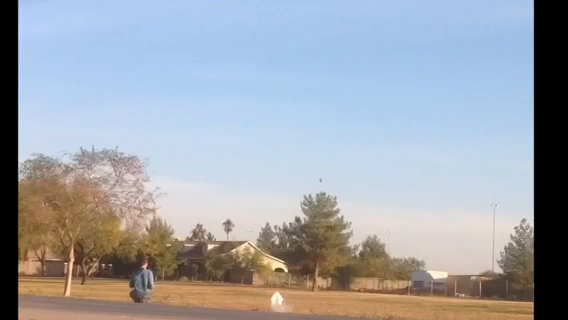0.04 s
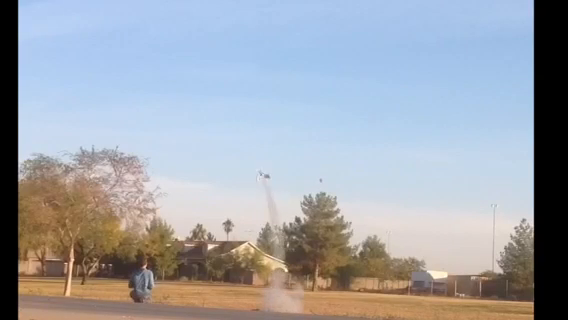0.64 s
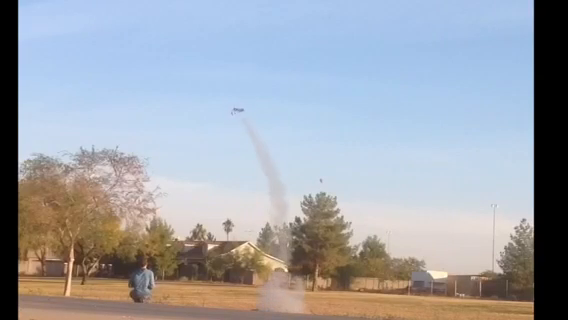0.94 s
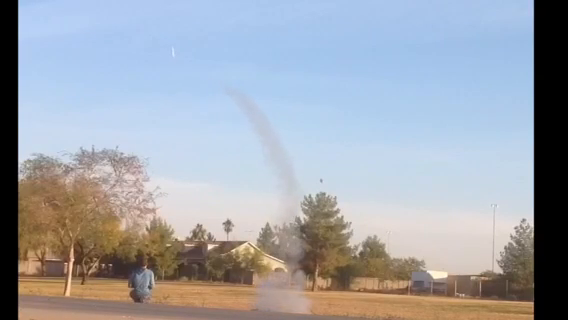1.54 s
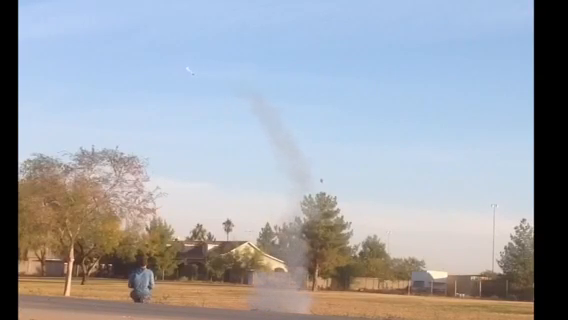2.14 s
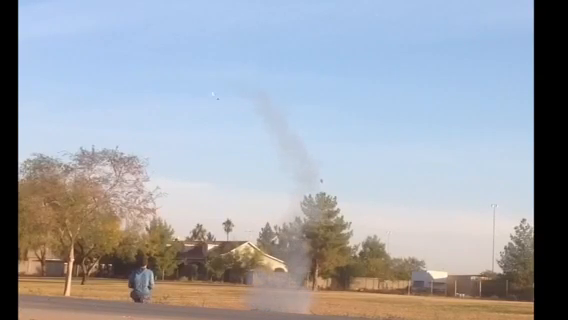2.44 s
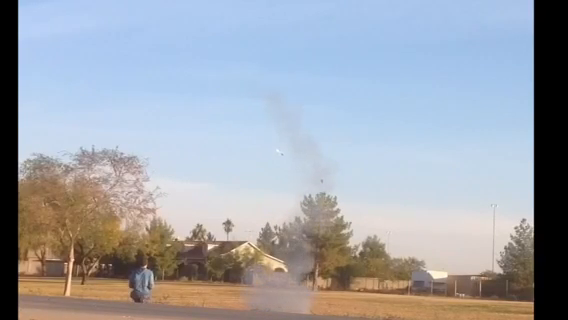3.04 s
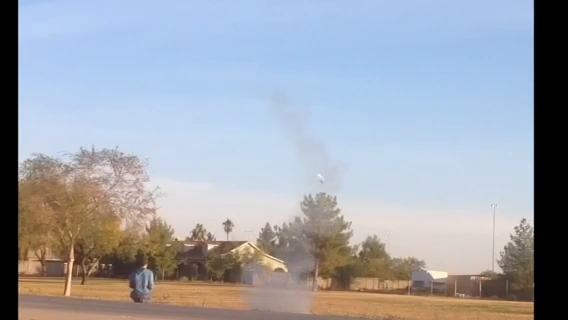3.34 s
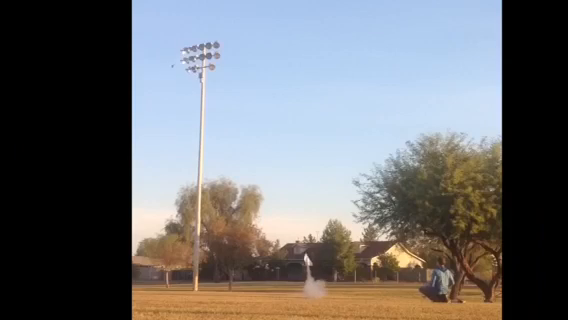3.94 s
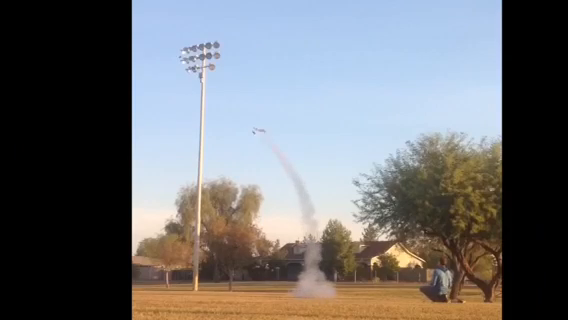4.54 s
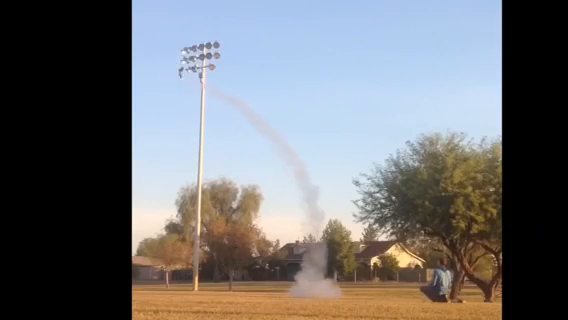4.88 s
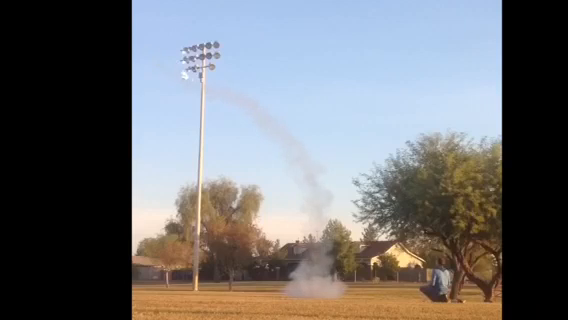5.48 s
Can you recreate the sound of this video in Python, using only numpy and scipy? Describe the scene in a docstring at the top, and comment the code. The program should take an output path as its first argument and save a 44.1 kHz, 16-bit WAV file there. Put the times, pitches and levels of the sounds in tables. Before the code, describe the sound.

A model rocket motor hisses sharply and stops, then a second does the same, outdoors with a low rumble of far traffic.

```python
"""A park, where two model rockets lift off one after the other. Each motor hisses, deepens as its nozzle
swings toward the listener, and burns out abruptly; the bounce off the ground sweeps notches down through
the hiss. Trees and houses echo faintly. Behind the first launch, distant traffic rumbles and a bird
chirps once. Behind the second, whose exhaust roars briefly on the pad, a far engine hums over traffic."""
import sys
import numpy as np
from scipy import signal
from scipy.fft import rfft, irfft, next_fast_len
from scipy.io import wavfile
from scipy.ndimage import uniform_filter1d, map_coordinates

SR = 44100
rng = np.random.default_rng(int(sys.argv[2]) if len(sys.argv) > 2 else 0)


def digitize_waveform(pressure):
    """Quantize a signal to 16-bit integers and store it at the path in sys.argv[1].

    Rows of a 2-D input are taken as channels; values are limited to [-1, 1].
    """
    field = np.atleast_2d(pressure).T
    bounded = np.clip(field, -1, 1)
    quanta = np.round(bounded * 32767).astype(np.int16)
    wavfile.write(sys.argv[1], SR, quanta)


N = 251955
TIME = np.arange(N) / SR
TOP_HZ = 15400  # upper edge of the sound
BACKGROUND_SWITCH_S = 3.56

# Loudness of each motor up to burnout: time_s, level_db
FIRST_BURN = [(0.0, -14.5), (0.16, -10.5), (0.354, -21.5), (0.442, -20), (0.54, -13.5), (0.788, -9.5),
              (0.824, -12), (0.94, -10.5), (1.26, -17)]
SECOND_BURN = [(3.57, -32), (3.63, -25.5), (3.9, -9.5), (4.118, -15), (4.24, -13), (4.332, -13.5),
               (4.514, -11), (4.894, -10.5), (4.914, -12.5), (5.02, -12)]
# Moments when each hiss brightens: centre_s, width_s, tilt_db_per_octave
FIRST_BRIGHTENING = [(.285, 0.061, 1.5), (.76, 0.37, 2.5)]
SECOND_BRIGHTENING = [(4.587, 0.2, 1.75)]
# Tone of each nozzle, before the flight colours it: frequency_hz, level_db
FIRST_NOZZLE = [(700, -24), (1500, -15.5), (2300, -8.5), (3200, -8), (4200, -4), (5500, -2.5), (7000, 2),
                (9000, -1), (11500, -2), (13500, -4), (15300, -6)]
SECOND_NOZZLE = [(700, -18), (1500, -8), (2500, -3), (3100, -3.5), (4000, 0), (5500, 1.5), (9000, 2),
                 (13000, -0.5), (15300, -3)]
# Time for the echo off trees and houses to fall 60 dB, before stretching: frequency_hz, decay_s
ECHO_DECAY = [(1000, 2.5), (4000, 1.1), (8000, .68), (14000, .38)]
# Tone of the traffic behind each launch: frequency_hz, level_db
FIRST_TRAFFIC = [(25, -49), (48, -43), (73, -26), (95, -19), (131, -8.5), (243, -1.5), (293, -5),
                 (394, -11.5), (520, -11.5), (750, -18.5), (1600, -20), (2300, -27.5), (3200, -38),
                 (5000, -46.5), (14500, -51.5), (15400, -61)]
SECOND_TRAFFIC = [(25, -36), (50, -28), (80, -23), (115, -2.5), (180, -0.5), (260, -3), (380, -7),
                  (600, -9), (1300, -10.5), (2000, -16.5), (3000, -24.5), (5000, -38.5), (14500, -45),
                  (15400, -50)]
# Droning bands in the first traffic: centre_hz, width_hz, level_db
DRONE_BANDS = [(91.3, 11, -14), (135, 19.9, -8.5), (230.7, 21, -0.5), (290, 9, 5)]
# Tone of exhaust striking the launch pad: frequency_hz, level_db
PAD_ROAR = [(30, -36), (200, -3.5), (380, -2), (780, -4), (1050, -17.5), (2500, -27.5)]


def amp(db):
    """Decibels to gain."""
    return 10 ** (np.asarray(db) / 20)


def unit(x):
    """Scale to rms 1."""
    return x / np.sqrt(np.mean(x ** 2) + 1e-20)


def along(points, hz):
    """Read a curve of frequency_hz, value points on a log frequency axis."""
    point_hz, values = np.transpose(points)
    return np.interp(np.log(hz + 1), np.log(point_hz), values)


def swell(centre_s, width_s):
    """A bell-shaped rise and fall that peaks at 1."""
    return np.exp(-((TIME - centre_s) / width_s) ** 2)


def wobble(rate_hz):
    """A smooth random drift through rate_hz points a second."""
    return map_coordinates(rng.standard_normal(int(N * rate_hz / SR) + 4), [TIME * rate_hz])


def sine(hz):
    """A sine of rms 1 that follows a pitch curve."""
    return np.sqrt(2) * np.sin(2 * np.pi * np.cumsum(hz) / SR)


def filtered(x, response):
    """Equalise x with a gain given as a function of frequency."""
    size = next_fast_len(N + SR // 2)
    return irfft(rfft(x, size) * response(np.fft.rfftfreq(size, 1 / SR)), size)[:N]


def noise(spectrum):
    """Noise of rms 1 with the given colour."""
    return unit(filtered(rng.standard_normal(N), lambda hz: amp(along(spectrum, hz))))


def flight(brightening, liftoff_s, climb_s, top_notch_hz, swing_at_s, swing_s, edges_hz, tilts_db):
    """Low cut, tilt per octave and first notch of a climb. Edges and tilts go: pad, swung round, top."""
    # the rocket speeds up, then levels off; its nozzle swings round early on
    height = 1 - np.exp(-(np.maximum(TIME - liftoff_s, 0) / climb_s) ** 2)
    swing = (1 + np.tanh((TIME - swing_at_s) / swing_s)) / 2
    pad_hz, air_hz, top_hz = edges_hz
    edge_hz = pad_hz * (air_hz / pad_hz) ** swing * (top_hz / air_hz) ** height
    pad_db, air_db, top_db = tilts_db
    tilt_db = pad_db + (air_db - pad_db) * swing + (top_db - air_db) * height
    tilt_db += sum(db * swell(centre_s, width_s) for centre_s, width_s, db in brightening)
    # the lag of the ground bounce grows with height, pulling the notch down from above hearing
    pad_notch_hz = 36000
    notch_hz = 1 / ((1 - height) / pad_notch_hz + height / top_notch_hz)
    return edge_hz, tilt_db, notch_hz


def thrust(burn, burnout_s):
    """A motor's envelope: it lights at once, burns, then dies ever faster, by 60 dB in burnout_s."""
    time_s, level_db = np.transpose(burn)
    lit = TIME > time_s[0] - .008
    spent = np.maximum(TIME - time_s[-1], 0) / burnout_s
    return amp(np.interp(TIME, time_s, level_db) - 60 * spent ** 2) * lit


def motor(climb, nozzle, edge_order, notch_depth, notch_reach, notch_spacing,
          ripple, ripple_lag_s, patchiness_db, sputter_db, crackle_db):
    """Jet hiss of one climbing rocket, heard directly and off the ground."""
    bin_hz, frame_s, white = signal.stft(rng.standard_normal(N), SR, nperseg=512, noverlap=384)
    hz = bin_hz[:, None] + 1
    edge_hz, tilt_db, notch_hz = (np.interp(frame_s, TIME, curve) for curve in climb)
    colour = amp(along(nozzle, hz) + tilt_db * np.log2(hz / 8000))
    # the big, low eddies radiate along the exhaust, so the low cut opens as the nozzle swings round
    colour /= np.sqrt(1 + (edge_hz / hz) ** edge_order)
    # the ground bounce returns ever later; the long plume blurs the higher notches
    lag_s = 1 / (notch_hz * notch_spacing)
    depth = notch_depth * np.exp(-(np.maximum(hz / notch_hz - 1, 0) / notch_reach) ** 2)
    depth *= amp(-1.7 * hz / TOP_HZ)  # rough grass scatters the treble of the bounce
    comb_cycles = np.maximum((hz - notch_hz) * lag_s, -.5)
    colour *= np.sqrt(1 - depth * np.cos(2 * np.pi * comb_cycles))
    # a weaker bounce near the listener closes in as the rocket climbs: fine ripples rise and fade
    ripple_depth = ripple * np.exp(-(lag_s / .00033) ** 2)
    colour *= np.sqrt(1 + ripple_depth * np.cos(2 * np.pi * hz * (ripple_lag_s - lag_s)))
    # narrow bands of the hiss fade in and out at random
    patches = uniform_filter1d(rng.standard_normal(white.shape), size=5, axis=0)
    patches = unit(uniform_filter1d(patches, size=36, axis=1))
    colour *= amp(patchiness_db * patches * np.sqrt(hz / 8000)) * (hz < TOP_HZ)
    colour /= np.sqrt(np.mean(colour ** 2, axis=0))  # the tone moves, the power holds
    hiss = signal.istft(white * colour, nperseg=512, noverlap=384)[1][:N]
    # the powder burns unevenly: slow sputter and millisecond crackle
    uneven = unit(amp(sputter_db * wobble(70) + crackle_db * wobble(1200)))
    return uneven * hiss


def echo(x, delay_s, stretch):
    """Scatter from trees and houses; the air takes the treble first."""
    hz, t, white = signal.stft(rng.standard_normal(SR), SR, nperseg=256)
    decay_s = stretch * along(ECHO_DECAY, hz)[:, None]
    tail = signal.istft(white * amp(-60 * t / decay_s), SR, nperseg=256)[1]
    delayed = np.pad(x, (int(delay_s * SR), 0))[:N]
    wet = signal.fftconvolve(delayed, tail / np.linalg.norm(tail))[:N]
    air_loss = [(2000, -3), (5000, -3.5), (9000, -7), (15000, -11.5)]  # frequency_hz, gain_db
    return filtered(wet, lambda hz: amp(along(air_loss, hz)))


def first_rocket():
    """A quick climb with a shallow notch sweep, and its echo."""
    climb = flight(FIRST_BRIGHTENING, liftoff_s=.32, climb_s=.46, top_notch_hz=3843, swing_at_s=.14,
                   swing_s=.097, edges_hz=(6560, 2150, 2100), tilts_db=(6.5, -.8, -3.5))
    hiss = motor(climb, FIRST_NOZZLE, edge_order=2.05, notch_depth=.3, notch_reach=2.8, notch_spacing=.9,
                 ripple=.08, ripple_lag_s=.001, patchiness_db=2.17, sputter_db=.62, crackle_db=0)
    jet = thrust(FIRST_BURN, burnout_s=.14) * hiss
    return jet + amp(-20.5) * echo(jet, delay_s=.034, stretch=1)


def first_traffic():
    """Distant road rumble with a low drone, swelling as a vehicle passes."""
    def bands(hz):
        return sum(amp(db) * np.exp(-((hz - centre) / width) ** 2) for centre, width, db in DRONE_BANDS)

    drone = unit(filtered(rng.standard_normal(N), bands))
    level = amp(-38 + 2 * swell(centre_s=2.4, width_s=1.1))
    return level * (noise(FIRST_TRAFFIC) + amp(-6) * drone)


def bird(peak_hz=3720, arch_hz=300):
    """One far, slightly rough chirp that arches up and down."""
    envelope = swell(centre_s=2.613, width_s=.018)
    pitch_hz = peak_hz - arch_hz * (1 - envelope) + 45 * wobble(300)
    return amp(-59) * envelope * sine(pitch_hz)


def second_traffic():
    """Softer road rumble whose level drifts a little."""
    return amp(-40 + .5 * wobble(2.8)) * noise(SECOND_TRAFFIC)


def engine_hum(peak_s=4.1, pitch_hz=124.2, sag_hz_per_s=1.6, beat_hz=.8, beat_share=.81):
    """A far engine sags slowly in pitch and pulses as two close tones beat."""
    t = TIME - peak_s
    beat = abs(1 + beat_share * np.exp(2j * np.pi * beat_hz * t)) / (1 + beat_share)
    return amp(-44 + 1.2 * wobble(9)) * beat * sine(pitch_hz - sag_hz_per_s * t)


def second_rocket():
    """A longer climb with a deep, flanging notch sweep, and its echo."""
    climb = flight(SECOND_BRIGHTENING, liftoff_s=3.715, climb_s=.81, top_notch_hz=2600, swing_at_s=3.99,
                   swing_s=.105, edges_hz=(10800, 2900, 1970), tilts_db=(-.1, 2.5, -2))
    hiss = motor(climb, SECOND_NOZZLE, edge_order=4.25,
                 notch_depth=.94, notch_reach=1.75, notch_spacing=.86,
                 ripple=.34, ripple_lag_s=.0011, patchiness_db=1.5, sputter_db=.51, crackle_db=.07)
    jet = thrust(SECOND_BURN, burnout_s=.21) * hiss
    return jet + amp(-25.5) * echo(jet, delay_s=.052, stretch=1.37)


def pad_blast(peak_s=3.89, peak_db=-32.5, rise_db_per_s=85, fall_db_per_s=448.5):
    """The second exhaust builds to a roar on the pad and stops fast as the rocket clears it."""
    t = TIME - peak_s
    below_peak_db = np.maximum(-rise_db_per_s * t, fall_db_per_s * t)
    return amp(peak_db - below_peak_db) * noise(PAD_ROAR)


def scene():
    """Two launches, each over its own background, the same in both ears."""
    launches = first_rocket() + second_rocket() + pad_blast()
    first_bed = first_traffic() + bird()
    second_bed = second_traffic() + engine_hum()
    mono = launches + np.where(TIME < BACKGROUND_SWITCH_S, first_bed, second_bed)
    return np.array([mono, mono])


def record(dry):
    """Clip the peaks at full scale and cut the treble steeply above TOP_HZ."""
    low_pass = lambda hz: 1 / (1 + (hz / TOP_HZ) ** 300)
    return np.array([filtered(np.clip(channel, -1, 1), low_pass) for channel in dry])


dry = scene()
out = record(dry)
digitize_waveform(out)
```